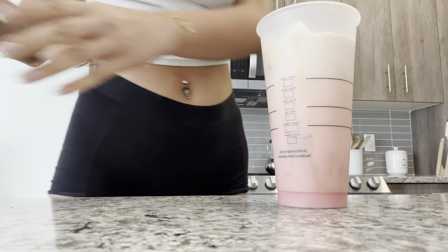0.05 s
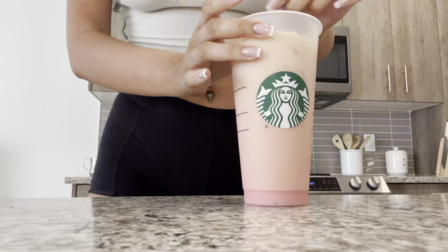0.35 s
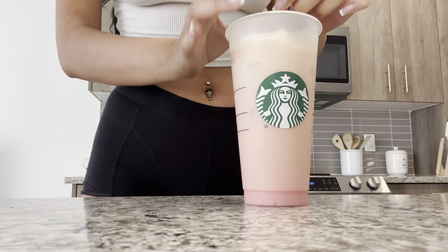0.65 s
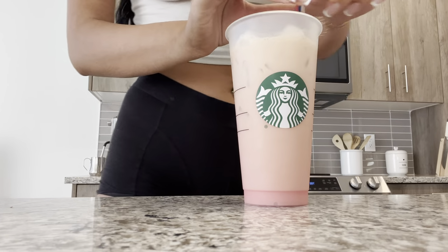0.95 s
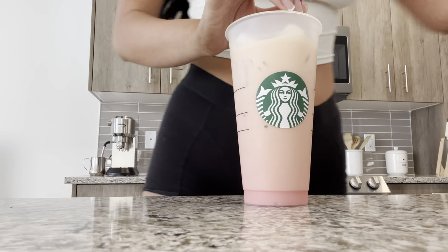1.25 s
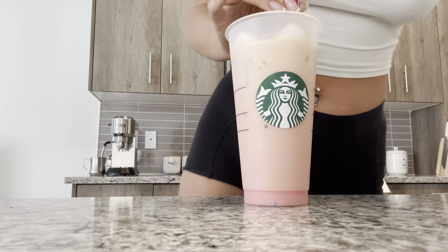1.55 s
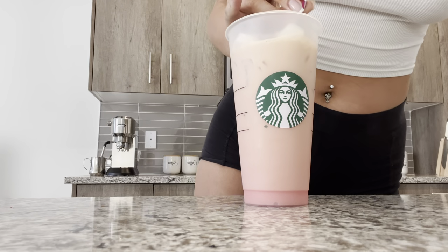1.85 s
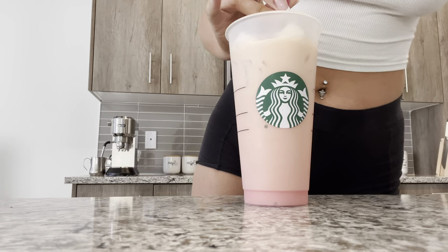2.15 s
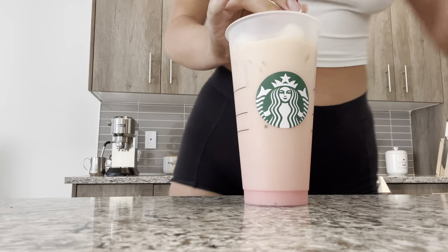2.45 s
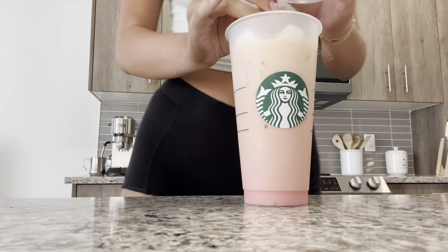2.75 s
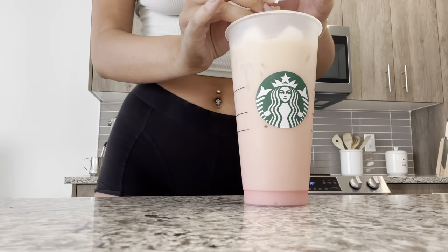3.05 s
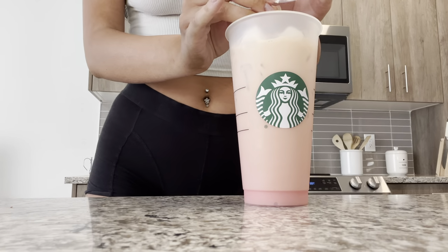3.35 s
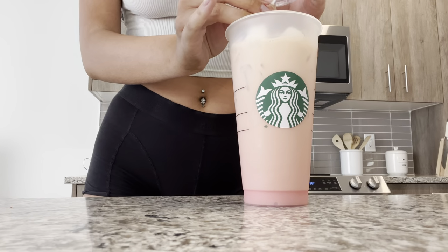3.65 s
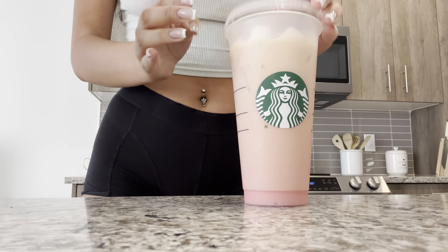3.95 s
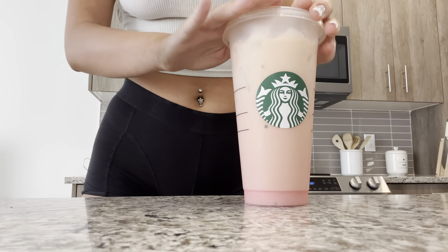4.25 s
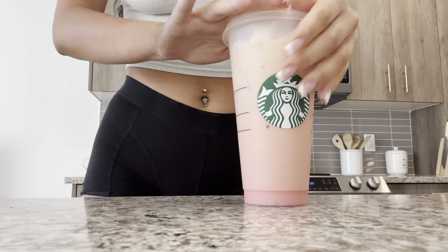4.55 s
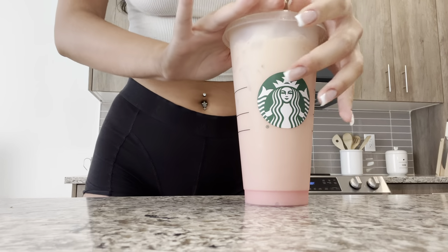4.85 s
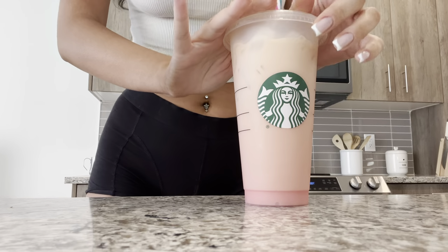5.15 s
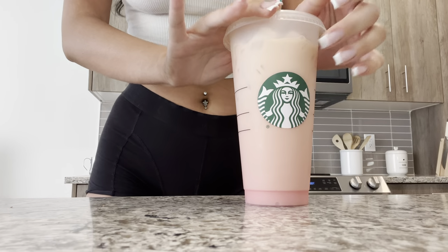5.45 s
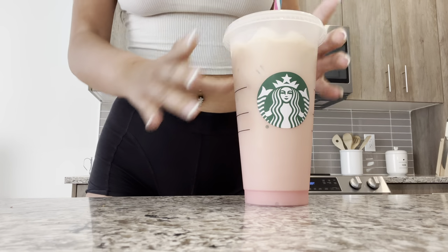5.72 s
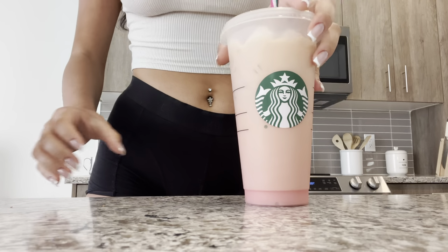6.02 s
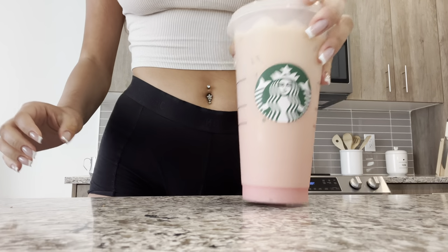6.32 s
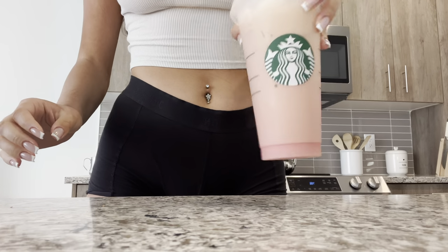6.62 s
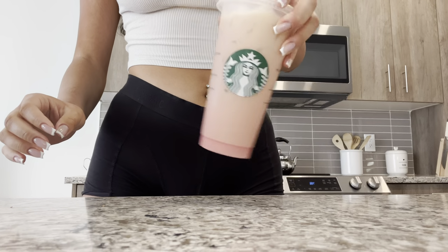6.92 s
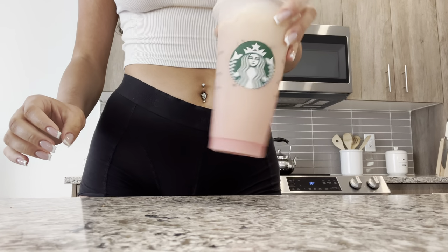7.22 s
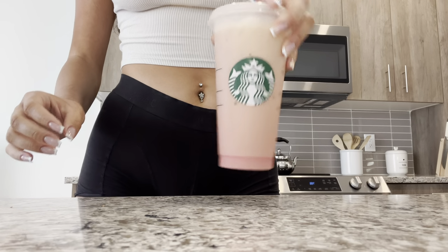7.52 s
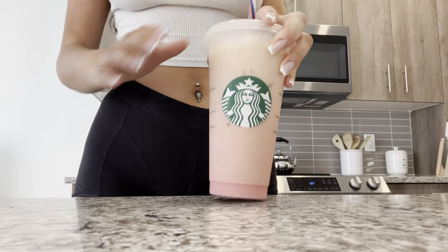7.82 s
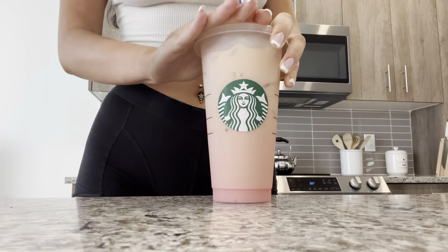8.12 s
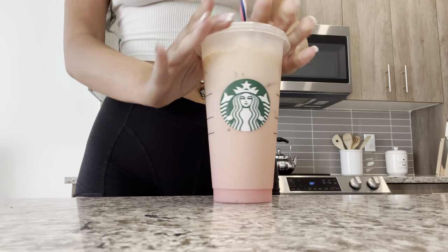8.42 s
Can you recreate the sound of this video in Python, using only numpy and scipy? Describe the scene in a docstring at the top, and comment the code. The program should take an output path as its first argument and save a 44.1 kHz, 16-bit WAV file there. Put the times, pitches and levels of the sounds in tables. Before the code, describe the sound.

A straw rasps through ice in a plastic cup, with light clicks and taps against the bottom. Fingers rub the plastic and a lid is pressed on with several knocks and sharp snaps. The drink is then swirled, ice rattling and liquid sloshing, and set down on a stone counter with a thud. Everything is close to the microphone, with a slight kitchen echo and a faint hum.

```python
"""Light clicks and a straw's tap, over a faint kitchen hum: an iced drink in a tall plastic cup stands on a
stone counter, close to a phone on the same slab. The straw rasps through the ice and bumps the bottom, fingers
slide and something rubs briefly. The lid is laid on and snapped shut with gulps of trapped air; the cup is
lifted, swirled and set down. Blows ring the cup, boom through the slab and echo in the kitchen."""
import sys
import numpy as np
from scipy import signal
from scipy.fft import rfft, irfft, next_fast_len
from scipy.io import wavfile
from scipy.ndimage import uniform_filter1d

SR = 44100
rng = np.random.default_rng(int(sys.argv[2]) if len(sys.argv) > 2 else 0)


def digitize_waveform(pressure):
    """Quantize a signal to 16-bit integers and store it at the path in sys.argv[1].

    Rows of a 2-D input are taken as channels; values are limited to [-1, 1].
    """
    field = np.atleast_2d(pressure).T
    bounded = np.clip(field, -1, 1)
    quanta = np.round(bounded * 32767).astype(np.int16)
    wavfile.write(sys.argv[1], SR, quanta)


N = 378378

# Event levels are relative: each source applies its own trim.
# Nails and straw on plastic. Each row: start in seconds, level in dB, brightest frequency in Hz.
PLASTIC_CLICKS = [(0.0548, -43, 4700), (1.299, -48.5, 3500), (1.656, -39.5, 4200), (1.947, -54, 11000),
                  (2.293, -58, 3000), (2.335, -54, 10000), (2.477, -59, 10000), (6.175, -46, 3100),
                  (6.276, -47, 4500), (0.073, -28.5, 3400), (0.4284, -22, 2960), (0.536, -27, 3940),
                  (0.58, -21, 5360), (0.61, -22.5, 4640), (0.66, -25, 2380), (0.779, -34.5, 5200),
                  (1.3751, -39, 1990), (1.75, -31, 2600), (3.39, -44, 2840), (3.587, -33, 5800),
                  (4.444, -39.5, 4070), (5.018, -24, 4950), (5.5217, -48, 5280), (6.056, -54, 2850),
                  (8.113, -33, 7500)]
# Straw tip on the cup bottom. Each row: start in seconds, clunk in dB, starting pitch in Hz,
# slab ring in dB, tick in dB.
STRAW_TAPS = [(0.06, -43, 1790, -44.5, -31), (2.048, -33.5, 1800, -40, -31.5), (2.744, -24, 1665, -35, -22),
              (2.754, -33, 1600, -33.5, -35), (2.992, -38.5, 1550, -52, -43),
              (3.103, -31.5, 1890, -37, -29.5), (3.324, -43, 1470, -50, -61),
              (3.333, -38.5, 1870, -47, -47), (3.342, -39, 1820, -65, -47), (3.601, -46, 1580, -45.5, -30)]
# Soft pushes of the hands. Each row: start in seconds, level in dB.
HAND_NUDGES = [(0.067, -27.5), (0.147, -34.5), (1.399, -30.5), (1.662, -38), (4.227, -35.5), (4.385, -42),
               (4.548, -33.5), (7.667, -30), (8.552, -36.5)]
# Straw through crushed ice. Each row: start and length in seconds, then crunch, fizz and drag in dB.
STIR_STROKES = [(0.39, 0.14, -32, -45, -44), (0.555, 0.062, -41.5, -48, -43)]
# Loudest cube bumps on the wall. Each row: start in seconds, level in dB, pitch in Hz.
ICE_BUMPS = [(0.409, -33, 1470), (0.454, -27.5, 1400), (0.49, -27, 1880), (0.554, -25, 1470),
             (0.573, -23.5, 1480), (0.658, -22.5, 1480), (0.686, -38, 1530), (0.715, -35, 1250),
             (0.74, -33.5, 1050), (0.766, -35, 1540), (0.812, -31.5, 1450), (0.888, -40.5, 1630),
             (0.923, -39.5, 1150), (0.988, -39, 1510), (1.036, -41, 1590), (1.066, -38.5, 1680),
             (1.102, -37, 1250), (1.117, -55, 1490), (1.207, -43, 1040), (1.23, -42, 1330),
             (2.182, -43.5, 1550), (2.049, -37, 920), (2.745, -39, 1040), (2.759, -35.5, 880),
             (3.103, -28.5, 962), (3.335, -30, 1290), (3.6, -30, 907), (3.608, -33, 1280),
             (2.812, -40, 1880), (2.843, -43, 1890), (2.884, -36, 1430), (3.967, -35, 1330),
             (4.048, -28, 1600), (4.242, -44, 1530), (4.443, -42.5, 1330), (4.681, -19, 1266),
             (4.973, -19, 1320), (6.357, -40.5, 1150), (6.571, -17.5, 1020), (6.599, -31, 1040),
             (6.645, -31, 1080), (6.661, -26, 967), (6.674, -26.5, 920), (6.772, -29, 1150),
             (6.819, -29, 1110), (6.858, -29.5, 1010), (6.898, -28.5, 1070), (6.997, -24.5, 1110),
             (7.024, -24, 1080), (7.049, -30.5, 980), (7.094, -24.5, 1020), (7.115, -26.5, 1100),
             (7.171, -23.5, 1100), (7.222, -24.5, 1060), (7.262, -26, 1100), (7.285, -24.5, 1000),
             (7.345, -25, 1030), (7.353, -22, 1120), (7.395, -24, 1100), (7.443, -25, 1090),
             (7.462, -26, 1045), (7.51, -30, 1005), (7.545, -26.5, 1050), (7.629, -21, 1050),
             (7.654, -25, 1110)]
# Spells of loose cubes bumping. Each row: start and length in seconds, level in dB, pitch in Hz.
SHIFT_SPELLS = [(0.441, 0.28, -38, 1710), (0.721, 0.41, -46, 1436), (1.211, 0.08, -50, 1250),
                (2.268, .07, -60, 1370), (2.46, .22, -56.5, 1290), (2.682, 0.2, -46, 1380),
                (3.248, 0.17, -47.5, 1320), (3.701, 0.24, -51.5, 1215), (4.368, 0.21, -56, 1390),
                (6.044, 0.1, -46.5, 1060)]
# Fingers on the cup. Each row: midpoint and length in seconds, level in dB.
FINGER_SLIDES = [(0.912, 0.58, -64.5), (1.42, 0.18, -66.5), (2.236, 0.24, -69.5), (2.827, 0.28, -58.5),
                 (3.603, 0.18, -63), (3.807, 0.18, -60.5), (4.054, 0.23, -53), (4.455, 0.49, -66),
                 (5.566, 0.25, -71.5), (5.956, 0.25, -69.5), (6.124, 0.23, -58), (6.282, 0.077, -71.5),
                 (7.742, 0.13, -52), (8.121, 0.33, -58.5), (8.366, 0.7, -58.5)]
# Brief rubs. Each row: start and length in seconds, level in dB.
RUB_SPELLS = [(1.636, 0.013, -39.5), (1.666, 0.086, -38.5)]
# Blows on cup and lid. Each row: start in seconds, knock in dB, pitch in Hz, slab ring in dB,
# deep boom in dB relative to the ring, crack in dB, room send in dB.
CUP_BLOWS = [(3.983, -16, 890, -50, -9, -17, -3.5), (4.011, -12, 790, -55, 11, -27, 0),
             (4.026, -27, 866, -50, -6, -37, -4), (4.062, -8.5, 836, -51, -7, -30, -7),
             (4.086, -26, 870, -61, 0, -35, -6), (4.181, -28, 730, -63, -38.5, -50, -25),
             (4.226, -37.5, 840, -65, 0, -54, -5), (4.6838, -12, 725, -26, 4.5, -18.5, -2),
             (4.915, -25.5, 880, -32.5, 10, -32, 6.5), (4.9733, -3, 896, -26, 8.5, -14, 0.5),
             (5.007, -23, 1055, -37, 10, -42, -7), (5.018, -18, 1040, -26, 10.5, -24.5, 12.5),
             (5.986, -34, 817, -61, -13, -42.5, 1.5), (6.143, -29.5, 1134, -27, -23, -34, 6),
             (6.147, -28.5, 870, -22, 0.5, -46, -7), (7.859, -6, 906, -13, -1.5, -27, -4.5),
             (7.884, -15, 876, -14.5, -2.5, -32, -14), (7.895, -16.5, 900, -29.5, 19, -41, -9.5),
             (7.910, -21, 990, -47, -5, -37.5, -5), (7.951, -26.5, 1000, -25, 7, -47, -17)]
# Lid rim jumping its bead. Each row: start in seconds, level in dB.
RIM_SNAPS = [(4.6812, -30.5), (4.6847, -10.5), (4.9142, -30), (4.973, -3.5), (5.0184, -21)]
# Air pockets. Each row: start in seconds, level in dB, starting pitch in Hz, t60 in seconds.
AIR_GULPS = [(4.685, -19, 960, 0.019), (4.9735, -15.5, 1010, 0.013), (5.02, -23.5, 695, 0.024),
             (5.987, -37, 1010, .025), (6.427, -35.5, 1100, 0.023), (6.502, -23.5, 1510, 0.024),
             (6.572, -24.5, 1900, 0.021), (6.602, -31.5, 994, 0.031), (7.007, -34, 810, 0.012),
             (7.1295, -21.5, 1550, 0.035), (7.368, -32.5, 1070, 0.024)]
# Fine crackle as the hand grips and ice tumbles. Each row: start and length in seconds, level in dB.
CRACKLE_SURGES = [(6.4, 0.17, -68), (6.535, 0.12, -53), (6.765, 0.027, -46), (7.135, 0.068, -59.5),
                  (7.48, 0.074, -64), (7.555, 0.018, -42)]
# Ice clumps in the swirl. Each row: start in seconds, level in dB, pitch in Hz.
CLUMP_CRUNCHES = [(6.544, -35.5, 2380), (6.548, -34, 6800), (6.571, -27.5, 2780), (6.584, -24.5, 4940),
                  (6.774, -31, 4430), (6.791, -36, 2670), (6.798, -38, 6350), (6.819, -40, 2570),
                  (6.856, -52, 3160), (6.876, -39, 3050), (6.9, -34, 3200), (6.908, -41.5, 9000),
                  (6.931, -36.5, 3150), (6.956, -32, 3420), (7.115, -36, 2940), (7.152, -33.5, 3380),
                  (7.181, -31.5, 3350), (7.22, -32.5, 4000), (7.228, -34.5, 8500), (7.25, -39, 7000),
                  (7.368, -30, 2650), (7.394, -39, 2080), (7.543, -37, 2260), (7.568, -35, 7000),
                  (7.594, -40, 9000), (7.679, -39.5, 2050), (7.707, -41, 3100)]

# Stone slab and cabinet. Each row: frequency in Hz, level in dB, t60 in seconds.
SLAB_MODES = [(65.4, -8, 0.53), (79, -6.5, 0.13), (93, -13, 0.19), (117.8, 2, 0.23), (134.4, -10, 0.5),
              (164.8, -10, 0.2), (190.2, -5.5, 0.48), (214.8, 2.5, 0.4), (233.5, -10.5, 0.23),
              (270, -8, 0.12), (324, -17.5, 0.034), (412, -3, 0.015), (386, -9, 0.043)]
# Cube on the wall; filled cup. Each row: multiple of the pitch, level in dB, t60 in seconds.
CUBE_MODES = [(0.721, -4.5, 0.0068), (1.001, -2, 0.0096), (1.3, -6.5, 0.0069), (2.201, -17.5, 0.0069)]
CUP_MODES = [(0.702, -2, 0.02), (0.999, 22.5, 0.0081), (1.168, -32, .012)]
# Kitchen echo. Each row: frequency in Hz, level in dB, t60 in seconds.
ROOM_BANDS = [(102, 6.5, 0.14), (404, 3.5, 0.9), (790, 0.5, 0.86), (1130, -0.5, 1), (1420, 2, 0.97),
              (1870, 8, 0.93), (4200, 6, 0.9), (6000, 5.5, 0.86), (8100, 1, 0.48), (14970, 4.5, 0.24)]
# The two microphone ports. Each row: frequency in Hz, lead of the left port in radians.
PORT_PHASE = [(1400, 0), (2200, 1.4), (3300, 1.5), (4400, 4.2), (6000, 3.7), (8000, 2.8), (11300, .1),
              (13500, -.8)]

# Spectra. Each row: frequency in Hz, level in dB.
AIR_SPECTRUM = [(15, -51.5), (25, 19.5), (90, -6.5), (128, -0.5), (264, -1.5), (354, -10.5), (415, -8.5),
                (673, -15), (1350, -21), (2700, -34), (5280, -41), (8550, -44), (10600, -40.5),
                (13100, -46.5), (15000, -59.5)]
SLEEVE_SPECTRUM = [(250, -14), (500, 6), (800, 6), (1300, -50), (5000, -25.5)]
STIR_SPECTRUM = [(180, -41), (300, -4), (421, -9), (548, 0.5), (598, 9.5), (653, -5), (808, -2.5),
                 (1510, 6), (2070, -1.5), (2300, -7), (2900, -4.5), (3500, -10.5), (6000, -9.5),
                 (7800, -53), (13200, -120)]
ICE_FIZZ_SPECTRUM = [(2300, -25), (4000, -3), (6000, -12), (8000, -3), (10500, -9), (13000, -9),
                     (15000, -27)]
TICK_SPECTRUM = [(300, -16), (700, 2.5), (1500, 6.5), (3000, 2), (6000, -2.5), (13000, -22.5)]
SKIN_SPECTRUM = [(1000, -2), (2500, -14), (5000, -13), (8000, -13.5), (11000, -14), (13500, -12.5),
                 (15000, -45)]
RUB_SPECTRUM = [(150, -5.5), (250, -9), (358, -13), (505, -12.5), (680, -9.5), (930, -8), (1390, -22.5),
                (2200, -21.5), (3270, -26), (4300, -28), (7560, -34.5), (8970, -36), (12600, -36),
                (15000, -43)]
PLASTIC_CRACK_SPECTRUM = [(700, -18), (1500, 9.5), (2800, 5.5), (5000, 0.5), (8000, -6.5), (12000, -7),
                          (15000, -12)]
SLOSH_SPECTRUM = [(120, -54), (200, -34), (277, -4), (374, -4.5), (526, -6), (650, -9), (800, 2.5),
                  (1080, 6), (1400, -3.5), (2400, -24), (5000, -60)]
ICE_CHIP_SPECTRUM = [(600, -17), (1400, 4.5), (2300, -2.5), (3200, -2), (5000, -6), (8000, -14.5),
                     (13000, -25)]
SCATTER_SPECTRUM = [(700, -20), (1500, -9), (2500, 9.5), (7000, 7), (11000, -9.5)]


def undb(db):
    """Decibels to gain."""
    return 10 ** (np.asarray(db) / 20)


def unit(x):
    """Scale to rms 1."""
    return x / np.sqrt(np.mean(x ** 2))


def peak(x):
    """Scale to peak 1."""
    return x / np.abs(x).max()


def along(table, hz, column=1):
    """Interpolate a column over log frequency."""
    rows = np.array(table, float)
    return np.interp(np.log(hz + 1), np.log(rows[:, 0]), rows[:, column])


def shape(x, response):
    """Filter by a complex function of Hz."""
    size = next_fast_len(x.shape[-1] + SR // 2, True)
    hz = np.arange(size // 2 + 1) * SR / size
    return irfft(rfft(x, size) * response(hz), size)[..., :x.shape[-1]]


def colour(x, spectrum):
    """Filter by a spectrum table."""
    return shape(x, lambda hz: undb(along(spectrum, hz)))


def band(x, hz, q):
    """Broad resonance, applied twice for steep skirts."""
    resonance = signal.iirpeak(hz, q, fs=SR)
    return signal.lfilter(*resonance, signal.lfilter(*resonance, x))


def fade(t, t60_s):
    """Exponential decay."""
    return np.exp(-np.log(1000) * t / t60_s)


def add(track, start_s, sound):
    """Mix a sound in."""
    start = max(int(start_s * SR), 0)
    track[start:start + len(sound)] += sound[:max(N - start, 0)]


def envelope(start_s, length_s, attack_s, t60_s, sag_db_per_s=0):
    """A movement builds, holds or sags, then dies away after its length."""
    t = np.maximum(np.arange(N) / SR - start_s, 0)
    attack = np.minimum(t / attack_s, 1) ** 2
    return attack * undb(-sag_db_per_s * t) * fade(np.maximum(t - length_s, 0), t60_s)


def movements(table, db_column=2, **timing):
    """Summed envelopes, one per row."""
    return sum(undb(row[db_column]) * envelope(row[0], row[1], **timing) for row in table)


def flicker(rate_hz, depth_db):
    """Uneven gain of a contact that grips and lets go."""
    hold = int(SR / rate_hz)
    steps = np.repeat(rng.standard_normal(N // 50), hold)[:N]
    return undb(depth_db * uniform_filter1d(np.clip(steps, -2, 2), hold // 2))


def grains(per_s, spread_db):
    """Tiny random impacts of very unequal size."""
    hits = (rng.random(N) < per_s / SR) * rng.choice([-1, 1], N)
    return unit(hits * undb(spread_db * np.minimum(rng.exponential(size=N), 4)))


def burst(decay_s):
    """Milliseconds of noise, repeatedly whitened and damped for an even spectrum."""
    t = np.arange(SR // 30) / SR
    noise = rng.standard_normal(len(t)) * fade(t, decay_s)
    for _ in range(4):
        white = irfft(np.exp(1j * np.angle(rfft(noise))), len(t))
        noise = white * fade(t, 2 * decay_s)
    return unit(noise) * np.sqrt(decay_s * SR / (14 * len(t)))


def knock(hz, modes, rise_s):
    """Damped modes that swell during contact."""
    t = np.arange(SR // 20) / SR
    ring = sum(undb(db) * fade(t, t60_s) * np.sin(2 * np.pi * hz * ratio * t)
               for ratio, db, t60_s in modes)
    return peak(ring * (1 - np.exp(-t / rise_s)) ** 2)


def clunk(hz, t60_s, halving_s):
    """A few cycles of plunging pitch: a wide, dull band."""
    t = np.arange(SR // 20) / SR
    phase = 2 * np.pi * hz * halving_s * np.log1p(t / halving_s)
    return peak(np.sin(phase) * fade(t, t60_s) * (1 - np.exp(-t * hz)))


def diffuse_noise(alike_below_hz):
    """Noise at two close ports: alike in the bass, unrelated in the treble."""
    mid, side = rng.standard_normal((2, N))
    side = shape(side, lambda hz: hz / np.hypot(hz, alike_below_hz))
    return np.array([mid + side, mid - side])


def kitchen_air(air_db=-50, hum_hz=132, hum_db=-62):
    """Steady room noise and an appliance's wavering hum."""
    hum = unit(shape(rng.standard_normal(N), lambda hz: 1 / (1 + ((hz - hum_hz) / 4) ** 2)))
    air = unit(colour(diffuse_noise(alike_below_hz=417), AIR_SPECTRUM))
    return undb(air_db) * air + undb(hum_db) * hum


def plastic_clicks(trim_db=-3, q=0.8):
    """Nails and straw tick brightly on plastic."""
    out = np.zeros(N)
    for start_s, db, hz in PLASTIC_CLICKS:
        click = signal.lfilter(*signal.iirpeak(hz, q, fs=SR), burst(decay_s=0.029))
        add(out, start_s, undb(db + trim_db) * peak(click))
    return out


def slab_ring(boom_db, vary_db=1, detune=0.0097):
    """The counter rings differently at each touch; a heavy, slow push favours its deepest modes."""
    t = np.arange(SR * 3 // 4) / SR
    ring = np.zeros(len(t))
    for hz, db, t60_s in SLAB_MODES:
        size, pitch = rng.standard_normal(2)
        gain = undb(db + along([(85, boom_db), (200, 0.031)], hz) + vary_db * size)
        ring += gain * fade(t, t60_s) * np.sin(2 * np.pi * hz * (1 + detune * pitch) * t)
    return ring


def straw_taps(tick_cutoff_hz=4500):
    """The tip ticks, clunks in the filled cup and rings the slab. Returns cup, slab."""
    cup, slab = np.zeros((2, N))
    lowpass = signal.butter(1, tick_cutoff_hz, fs=SR)
    for start_s, db, hz, slab_db, tick_db in STRAW_TAPS:
        add(cup, start_s, undb(db) * clunk(hz, t60_s=0.015, halving_s=0.00195))
        add(cup, start_s, undb(tick_db) * peak(signal.lfilter(*lowpass, burst(decay_s=0.00605))))
        ring = slab_ring(boom_db=-17)
        add(slab, start_s, undb(slab_db) * ring * fade(np.arange(len(ring)) / SR, t60_s=1))
    return cup, slab


def hand_nudges():
    """Soft pushes shake only the slab, briefly."""
    slab = np.zeros(N)
    for start_s, db in HAND_NUDGES:
        ring = peak(slab_ring(boom_db=6))
        add(slab, start_s, undb(db) * ring * fade(np.arange(len(ring)) / SR, t60_s=0.018))
    return slab


def sleeve_swish(level_db=-55):
    """An arm sweeps softly past."""
    swish = unit(colour(rng.standard_normal(N), SLEEVE_SPECTRUM))
    return undb(level_db) * swish * envelope(start_s=0.246, length_s=0.088, attack_s=0.038, t60_s=0.15)


def stirring(crunch_trim_db=-2, drag_trim_db=1, judder_hz=212, judder_db=-32.5):
    """Crushed ice rasps along the straw; the tip drags and chatters, setting the slab humming."""
    stroke = dict(attack_s=0.024, t60_s=0.91, sag_db_per_s=38)  # sags as the ice gives way
    grip = flicker(rate_hz=110, depth_db=3.2)
    crunch = colour(grains(per_s=1500, spread_db=2.2) * grip, STIR_SPECTRUM)
    crunch /= np.std(shape(crunch, lambda hz: (hz > 1000) & (hz < 3500)))
    fizz = unit(colour(grains(per_s=1200, spread_db=3.5) * grip, ICE_FIZZ_SPECTRUM))
    ring = slab_ring(boom_db=-9)
    drag = rng.standard_normal(N) * movements(STIR_STROKES, db_column=4, **stroke)
    hum = signal.fftconvolve(drag, ring / np.linalg.norm(ring))[:N]
    judder = np.sin(2 * np.pi * judder_hz * np.arange(N) / SR)
    judder *= envelope(start_s=0.564, length_s=0.069, attack_s=0.019, t60_s=0.17)
    return (undb(crunch_trim_db) * crunch * movements(STIR_STROKES, **stroke)
            + fizz * movements(STIR_STROKES, db_column=3, **stroke)
            + undb(drag_trim_db) * hum + undb(judder_db) * judder)


def cube_bump(hz, rise_s=0.002, rebound_db=-8, rebound_s=0.0022):
    """A cube hits the wall, then rocks onto another corner."""
    lag, pitch = rng.uniform(-1, 1, 2)
    hit = knock(hz, CUBE_MODES, rise_s)
    rebound = knock(hz * np.exp(pitch / 5), CUBE_MODES, rise_s)
    delay = int(SR * rebound_s * (1 + lag / 2))
    return hit + undb(rebound_db) * np.pad(rebound, (delay, 0))[:len(hit)]


def ice_bumps(trim_db=-1):
    """Single cubes strike the wall."""
    out = np.zeros(N)
    for start_s, db, hz in ICE_BUMPS:
        add(out, start_s, undb(db + trim_db) * cube_bump(hz))
    return out


def shifting_ice(bump_db=1.5, tick_db=-10, gap_s=0.015, gap_spread=0.59, spread_db=2, pitch_spread=0.2):
    """Loose cubes catch and slip unevenly; each slip is a bump and a dry tick of plastic."""
    bumps, ticks = np.zeros((2, N))
    for start_s, length_s, db, hz in SHIFT_SPELLS:
        spacings, sizes, pitches = rng.standard_normal((48, 3)).T
        gaps_s = gap_s * np.exp(gap_spread * spacings)
        for offset_s, size, pitch in zip(np.cumsum(gaps_s) - gaps_s, sizes, pitches):
            gain = undb(db + spread_db * size)
            tick = burst(decay_s=0.021)
            if offset_s < length_s:
                add(bumps, start_s + offset_s, gain * cube_bump(hz * np.exp(pitch_spread * pitch)))
                add(ticks, start_s + offset_s, gain * tick)
    return undb(bump_db) * bumps + undb(tick_db) * colour(ticks, TICK_SPECTRUM)


def finger_slides(trim_db=1):
    """Skin rubs plastic in short strokes of fine, uneven slips."""
    pressure = np.zeros(N)
    for middle_s, length_s, db in FINGER_SLIDES:
        add(pressure, middle_s - length_s / 2, undb(db) * np.hanning(int(length_s * SR)))
    slips = grains(per_s=2300, spread_db=4) * flicker(rate_hz=45, depth_db=4)
    return undb(trim_db) * unit(colour(slips, SKIN_SPECTRUM)) * pressure


def brief_rub(trim_db=-3):
    """A brief rub of fine, uneven slips."""
    slips = grains(per_s=2500, spread_db=3) * flicker(rate_hz=140, depth_db=2)
    motion = movements(RUB_SPELLS, attack_s=0.022, t60_s=0.15, sag_db_per_s=53)
    return undb(trim_db) * unit(colour(slips, RUB_SPECTRUM)) * motion


def rub_squeak(pitch_hz=506, waver_depth=0.04, level_db=-43.5, octave_db=-6):
    """The rub gives a faint, wavering tone."""
    waver = unit(uniform_filter1d(rng.standard_normal(N), SR // 100))
    phase = 2 * np.pi * np.cumsum(pitch_hz * (1 + waver_depth * waver)) / SR
    tone = (np.sin(phase) + undb(octave_db) * np.sin(2 * phase)) * flicker(rate_hz=150, depth_db=4)
    return undb(level_db) * tone * envelope(start_s=1.712, length_s=0.027, attack_s=0.02, t60_s=0.26)


def cup_blows(crack_trim_db=-6, slab_trim_db=-7, knock_lag_s=0.00048, crack_lead_s=0.001):
    """Each blow cracks on the plastic, rings the cup and shakes the slab. Returns cup, room send, slab."""
    cup, send, slab = np.zeros((3, N))
    for start_s, db, hz, slab_db, boom_db, crack_db, room_db in CUP_BLOWS:
        body = undb(db) * knock(hz, CUP_MODES, rise_s=0.0015)
        impact = np.pad(burst(decay_s=0.006), (SR // 200, 0))
        crack = undb(crack_db + crack_trim_db) * colour(impact, PLASTIC_CRACK_SPECTRUM)[SR // 250:]
        for lag_s, sound, send_db in ((knock_lag_s, body, room_db), (-crack_lead_s, crack, room_db - 1)):
            add(cup, start_s + lag_s, sound)
            add(send, start_s + lag_s, undb(send_db) * sound)
        add(slab, start_s, undb(slab_db + slab_trim_db) * slab_ring(boom_db))
    return cup, send, slab


def lid_snaps(rim_hz=10400, width_hz=4500, trim_db=-1):
    """The thin rim jumps its bead and rings, very high and short."""
    out = np.zeros(N)
    for start_s, db in RIM_SNAPS:
        ring = band(burst(decay_s=0.0061), rim_hz, q=rim_hz / width_hz)
        add(out, start_s, undb(db + trim_db) * peak(ring))
    return out


def air_gulps():
    """Air trapped under the lid and in the drink gulps, falling in pitch."""
    out = np.zeros(N)
    for start_s, db, hz, t60_s in AIR_GULPS:
        add(out, start_s, undb(db) * clunk(hz, t60_s, halving_s=0.002))
    return out


def tumbling(spectrum, per_s, spread_db, side_db=-7):
    """Impacts all over the cup: most reach both ports alike, some stray."""
    mid = grains(per_s, spread_db)
    side = undb(side_db) * grains(per_s, spread_db)
    return unit(colour(np.array([mid + side, mid - side]), spectrum))


def swirling(slosh_db=-45, chips_db=-51, fizz_db=-59, crunch_trim_db=3, crunch_s=0.0079):
    """The drink sloshes and settles; ice chips tick, clumps crunch, fine crackle surges. Stereo."""
    slosh = tumbling(SLOSH_SPECTRUM, per_s=700, spread_db=2.5) * flicker(rate_hz=70, depth_db=3)
    chips = tumbling(ICE_CHIP_SPECTRUM, per_s=1200, spread_db=3) * flicker(rate_hz=110, depth_db=3.5)
    fizz = tumbling(ICE_FIZZ_SPECTRUM, per_s=700, spread_db=4.5) * flicker(rate_hz=160, depth_db=3.5)
    crunches = np.zeros(N)
    window = np.hanning(int(crunch_s * SR))
    for start_s, db, hz in CLUMP_CRUNCHES:
        crunch = band(rng.standard_normal(len(window)) * window, hz, q=0.95)
        add(crunches, start_s - crunch_s / 5, undb(db + crunch_trim_db) * peak(crunch))
    drink = undb(slosh_db) * slosh + undb(chips_db) * chips + undb(fizz_db) * fizz
    motion = envelope(start_s=6.274, length_s=1.385, attack_s=0.36, t60_s=1.5)
    surges = movements(CRACKLE_SURGES, attack_s=0.016, t60_s=0.024)
    return motion * drink + surges * fizz + crunches


def bending_waves(x, delay_at_1khz_s=0.002804):
    """In stone, low notes travel slower and arrive later."""
    return shape(x, lambda hz: np.exp(-4j * np.pi * delay_at_1khz_s * np.sqrt(1000 * hz)))


def scatter(x, level_db=-4, crossfade_s=0.07):
    """Short waves glance off cup, hands and stone, differently per port and as the hands move."""
    t = np.arange(SR // 150) / SR
    paths = rng.standard_normal((6, 2, len(t))) * fade(t, t60_s=0.008)
    paths /= np.linalg.norm(paths, axis=2, keepdims=True)
    treble = colour(x, SCATTER_SPECTRUM)
    position = np.arange(N) / SR / crossfade_s
    out = np.zeros((2, N))
    for k, path in enumerate(paths):
        share = np.sin(np.pi / 2 * np.minimum((position - k) % len(paths), 2))
        out += signal.oaconvolve((treble * share)[None], path, axes=1)[:, :N]
    return undb(level_db) * out


def kitchen_echo(x, gap_s=0.00043, early_db=5, early_t60_s=0.13):
    """Strong early echoes off the cabinets, then a hard-wall tail, longest near 1 kHz."""
    hz, t, cells = signal.stft(diffuse_noise(alike_below_hz=400)[:, :SR], SR, nperseg=256)
    late = fade(t, along(ROOM_BANDS, hz, column=2)[:, None])
    early = undb(early_db) * fade(t, early_t60_s)
    cells *= (early + late) * undb(along(ROOM_BANDS, hz))[:, None]
    response = signal.istft(cells, SR)[1] / np.sqrt(SR / 10)
    response *= np.clip(np.arange(response.shape[1]) / SR / gap_s - 1, 0, 1)
    return signal.fftconvolve(x[None], response, axes=1)[:, :N]


def scene(direct_pan_db=1, slab_pan_db=-2, slab_skew_s=0.0002):
    """Airborne sound reaches the two ports out of step; both feel the slab; the kitchen echoes."""
    blows, blow_send, blow_slab = cup_blows()
    nudges = hand_nudges()
    taps, tap_slab = straw_taps()
    slab = bending_waves(blow_slab + nudges + tap_slab)
    handling = ice_bumps() + plastic_clicks() + stirring() + finger_slides() + shifting_ice()
    swirl, lid, gulps = swirling(), lid_snaps(), air_gulps()
    rubbing = brief_rub() + sleeve_swish() + rub_squeak()
    close = blows + taps + lid + gulps + handling + rubbing
    sides = np.array([[0.5], [-0.5]])  # left, right
    direct = shape(close + swirl, lambda hz: np.exp(1j * sides * along(PORT_PHASE, hz))) + scatter(close)
    felt = shape(slab, lambda hz: np.exp(2j * np.pi * hz * sides * slab_skew_s))
    echo = kitchen_echo(undb(-9) * blow_send + undb(-22) * lid + undb(-8) * gulps + undb(-14) * handling
                        + undb(-13) * swirl[0] + undb(-11) * taps + undb(-4) * rubbing + undb(-7) * slab)
    return direct * undb(sides * direct_pan_db) + felt * undb(sides * slab_pan_db) + echo + kitchen_air()


def record(dry, low_cut_hz=57, droop_db=-8, top_hz=15900):
    """The phone drops deep rumble, droops in the high treble and cuts the top."""
    lean = shape(dry, lambda hz: hz ** 5 / np.hypot(hz ** 5, low_cut_hz ** 5))
    dull = colour(lean, [(12500, 0.015), (15000, droop_db)])
    return signal.sosfilt(signal.ellip(8, 0.2, 70, top_hz, fs=SR, output="sos"), dull)


dry = scene()
out = record(dry)
digitize_waveform(out)
```